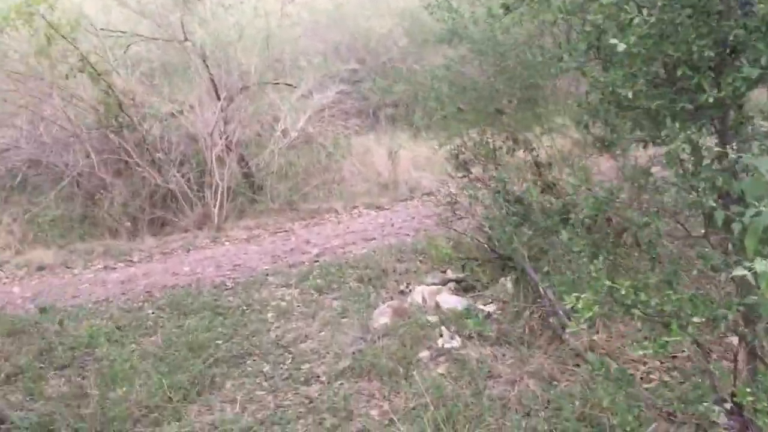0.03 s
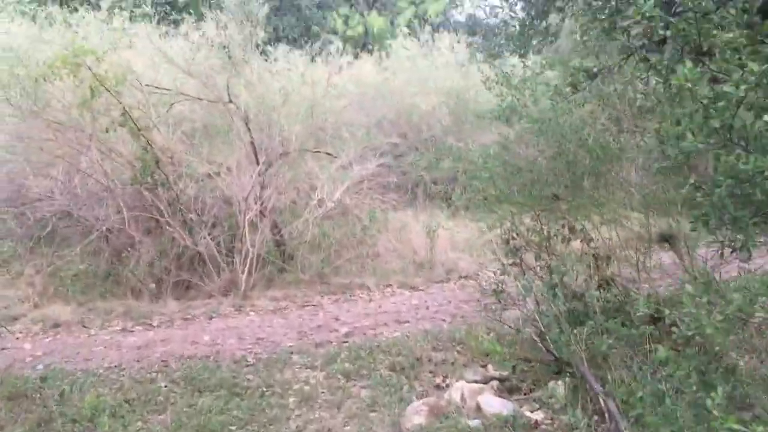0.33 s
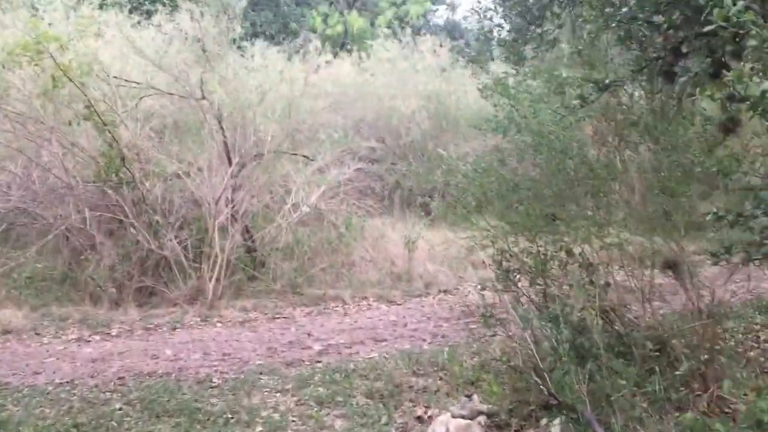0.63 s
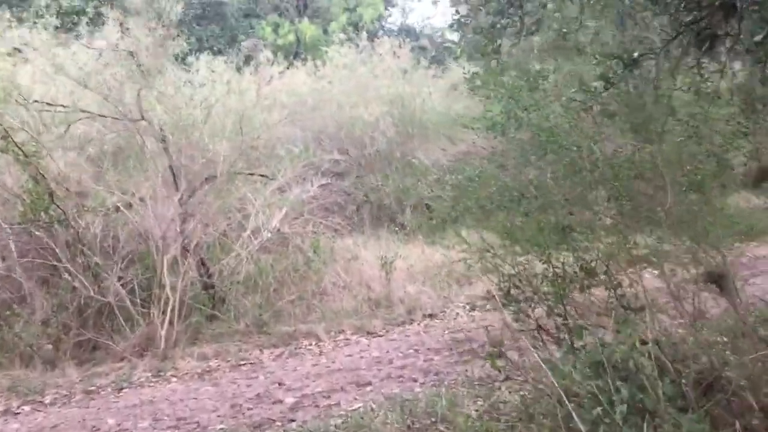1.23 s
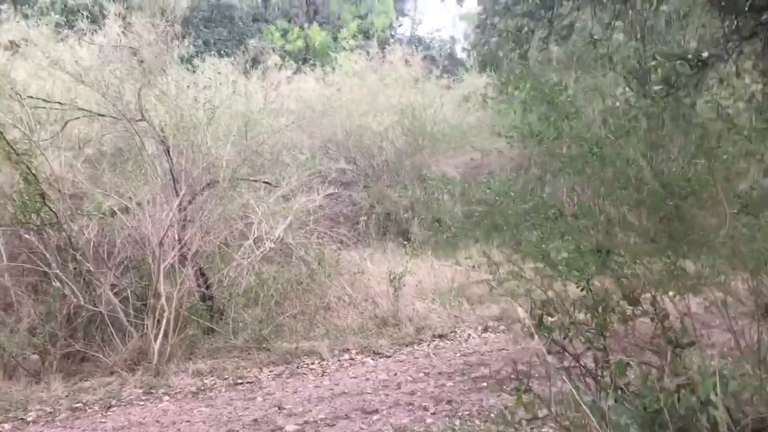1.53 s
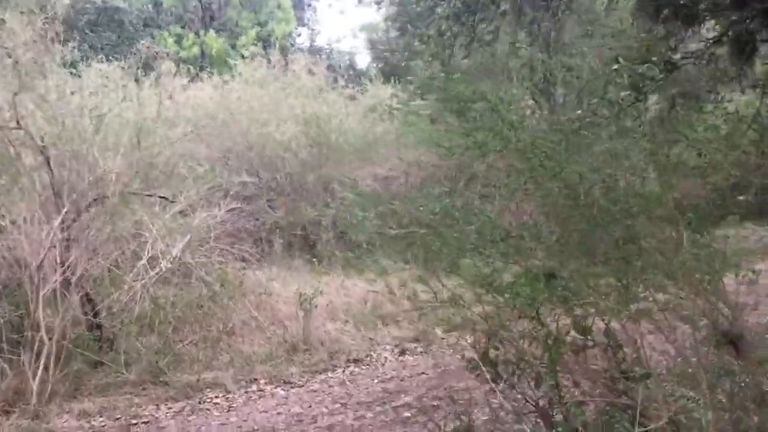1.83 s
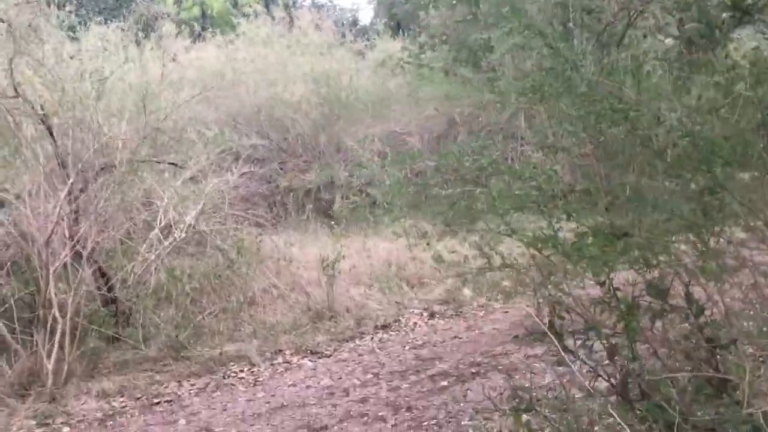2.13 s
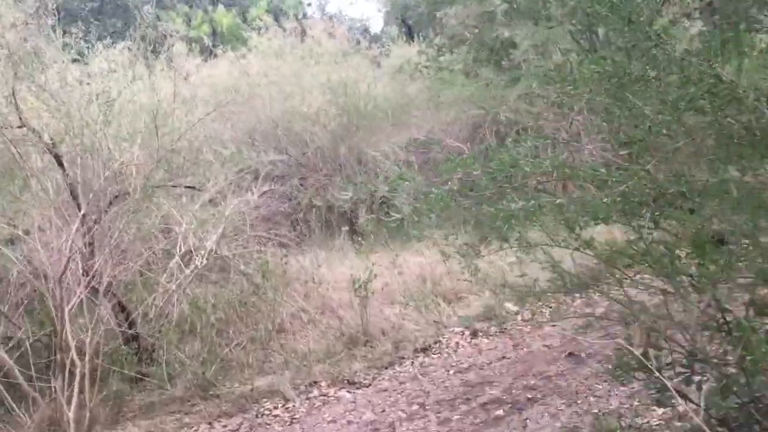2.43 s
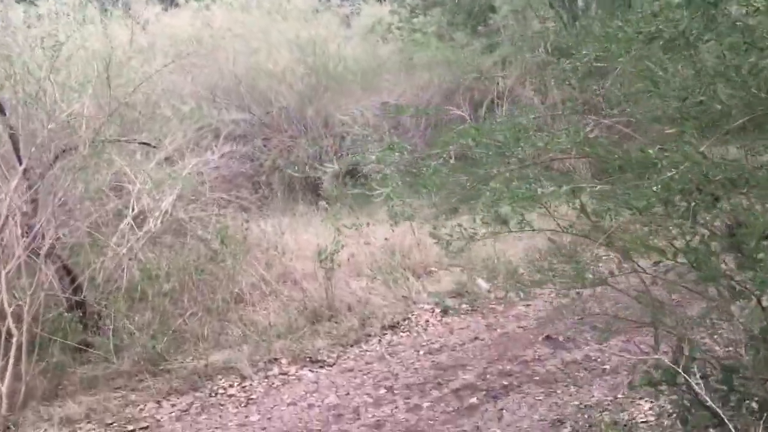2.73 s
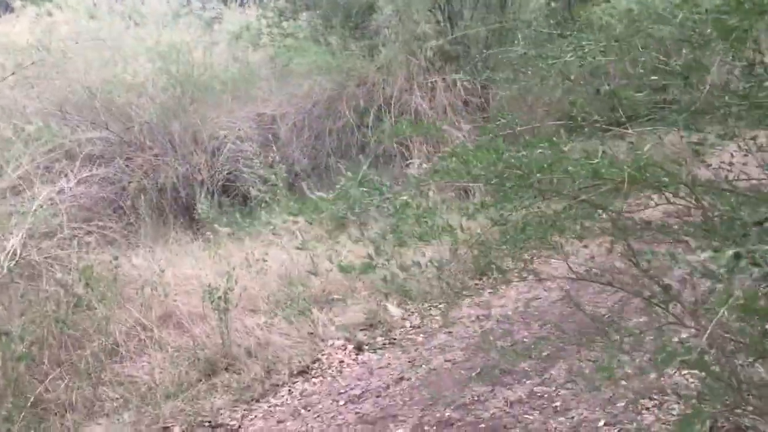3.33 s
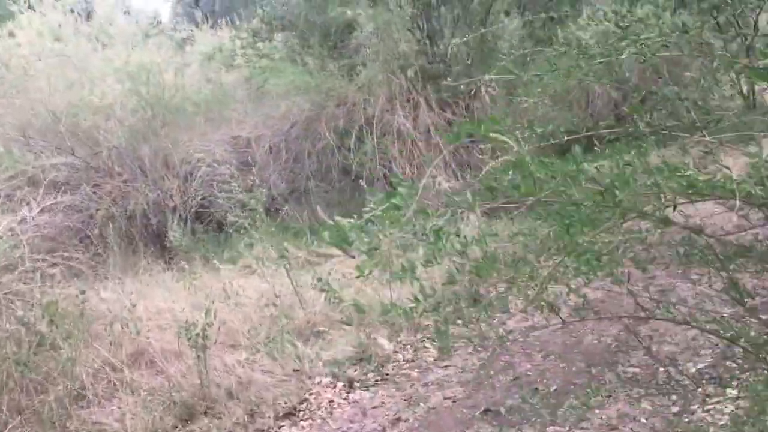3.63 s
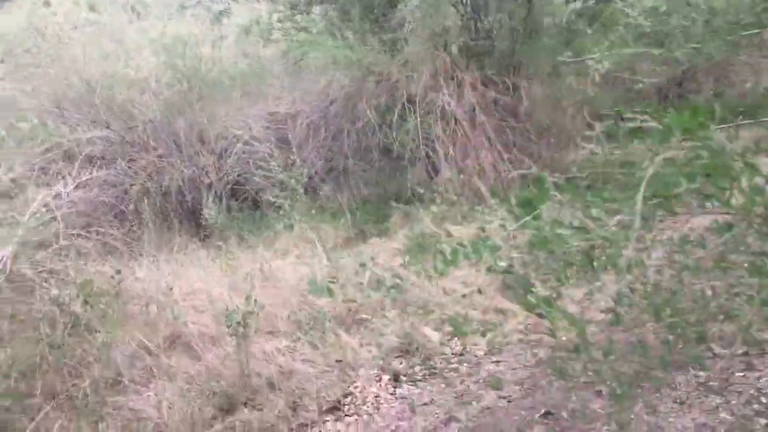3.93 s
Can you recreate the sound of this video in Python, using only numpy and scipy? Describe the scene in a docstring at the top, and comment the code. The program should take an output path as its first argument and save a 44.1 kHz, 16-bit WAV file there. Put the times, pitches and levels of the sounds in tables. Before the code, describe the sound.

Scuffing steps on loose dirt and grit, over the low roar of a faraway road.

```python
"""Slow steps on a dirt trail

Close to a microphone in the walker's hand, soles scuff through loose dirt and dry grass brushes the legs.
Stones crunch, grit and twigs tick, footfalls thud softly and one sole scrapes on stone.
Far behind, traffic roars with a low rumble and a faint hum. The hand softly bumps the microphone."""
import sys
import numpy as np
from scipy import signal
from scipy.fft import rfft, irfft
from scipy.io import wavfile
from scipy.ndimage import uniform_filter1d

SR = 44100
rng = np.random.default_rng(int(sys.argv[2]) if len(sys.argv) > 2 else 0)


def wav_record(signal):
    """Record a signal, one row per channel, as 16-bit PCM in the file named by sys.argv[1]."""
    frames = np.transpose(np.atleast_2d(signal))
    bounded = np.clip(frames, -1, 1)
    # unit amplitude maps onto the largest positive 16-bit level
    quanta = np.round(bounded * 32767).astype(np.int16)
    wavfile.write(sys.argv[1], SR, quanta)


N = 176400
t = np.arange(N) / SR


def undb(db):
    """Decibels to gain."""
    return 10 ** (np.asarray(db) / 20)


def unit(x):
    """Scale to rms 1."""
    return x / np.sqrt(np.mean(x ** 2) + 1e-20)


def bin_octaves(size):
    """Octaves above 1 Hz of each spectrum bin."""
    return np.log2(np.maximum(np.arange(size // 2 + 1) * SR / size, 1))


def colour(x, points, tilt_db=0):
    """Filter by (freq_hz, gain_db) points, tilted per octave; rms 1."""
    octave = bin_octaves(len(x))
    hz, db = np.array(points, float).T
    octaves_below = np.maximum(np.log2(hz[0]) - octave, 0)
    gain_db = np.interp(octave, np.log2(hz), db) + tilt_db * octave - 20 * octaves_below
    return unit(irfft(rfft(x) * undb(gain_db), len(x)))


def ring(x, hz, width):
    """One resonance; width is a share of the centre."""
    w = 2 * np.pi * hz / SR
    a = np.sin(w) * width / 2
    return signal.lfilter([a, 0, -a], [1 + a, -2 * np.cos(w), 1 - a], x)


def band(x, hz, width):
    """The same resonance twice, for steeper sides; rms 1."""
    return unit(ring(ring(x, hz, width), hz, width))


def wander(per_s):
    """A smooth random drift; rms 1."""
    hold = max(int(SR / per_s), 2)
    stairs = np.repeat(rng.standard_normal(N // hold + 1), hold)
    return unit(uniform_filter1d(stairs, hold)[:N])


def grains(per_s, spread_db):
    """Random clicks of uneven size; rms 1."""
    clicks = (rng.random(N) < per_s / SR) * rng.choice([-1, 1], N)
    return unit(clicks * undb(spread_db * np.minimum(rng.exponential(size=N), 5)))


def swells(rows):
    """A gain curve with one bell-shaped swell a row."""
    return sum(undb(db) * np.exp(-((t - peak) / width) ** 2) for peak, width, db in rows)


def add(out, start_s, x):
    """Mix a short sound in at its time."""
    i = max(int(start_s * SR), 0)
    out[i:i + len(x)] += x[:max(N - i, 0)]


# Hiss all around the trail: freq_hz, gain_db
AIR_SPECTRUM = [(1500, -3), (3500, 2), (4900, -4), (6000, -.5), (9500, 1.5), (10400, -10.5), (11200, -5),
                (15500, -5)]

def air():
    """The thin, steady hiss of still air."""
    return undb(-69.5) * colour(rng.standard_normal(N), AIR_SPECTRUM)


# Engine rumble from the far road: freq_hz, gain_db
RUMBLE_SPECTRUM = [(20, -40), (32, -22), (45, -7.5), (58, 1), (80, -2), (120, -7.5), (200, -8.5),
                   (290, -9.5), (480, -19), (900, -28), (2000, -50), (8000, -80)]
# Course that the far hum wavers around: time_s, level_db
HUM_LEVELS = [(0, -53), (.25, -68.5), (.5, -59), (.72, -51.5), (.85, -65), (1.45, -58), (2.1, -64.5),
              (2.9, -80), (4, -78)]

def engines():
    """Far engines rumble, with a wavering hum inside a fading drone."""
    rumble = undb(-51) * colour(rng.standard_normal(N), RUMBLE_SPECTRUM)
    pitch_hz = 346.7 * (1 + .0068 * wander(14))
    hum = np.sqrt(2) * np.sin(2 * np.pi * np.cumsum(pitch_hz) / SR)
    hum_db = np.interp(t, *np.array(HUM_LEVELS).T) + 2.2 * wander(8.86)
    drone = undb(-58 - 3 * t) * band(rng.standard_normal(N), hz=392, width=.67)
    return rumble + undb(hum_db) * hum + drone


def flutter(x, depth_db, per_s):
    """Moving air makes each narrow band of a far sound waver on its own."""
    spectrum, centre_octaves = rfft(x), np.arange(8.5, 12.1, .2)
    indices = np.arange(len(centre_octaves))
    place = np.interp(bin_octaves(N), centre_octaves, indices)
    strips = (irfft(spectrum * np.maximum(1 - np.abs(place - k), 0), N) for k in indices)
    return unit(sum(strip * undb(depth_db * wander(per_s)) for strip in strips))


# Tyre roar as it reaches the trail: freq_hz, gain_db
TYRE_SPECTRUM = [(350, -28), (560, -9.5), (690, -1), (850, .5), (1020, -1), (1170, -7), (1420, -6),
                 (1700, -11.5), (2050, -18), (2400, -25), (2900, -34), (4500, -43.5), (10000, -58)]
# Upper band of that far roar: time_s, level_db
UPPER_ROAR_LEVELS = [(0, -63), (1.2, -64), (2.0, -57), (2.7, -53), (3.3, -65), (4, -51.5)]

def tyres():
    """Tyres roar and slowly recede, their treble lost over the distance."""
    roar = flutter(colour(rng.standard_normal(N), TYRE_SPECTRUM), depth_db=2, per_s=18)
    roar_db = -46 - .23 * t + .25 * wander(3.03)
    upper = band(rng.standard_normal(N), hz=1386, width=.31)
    upper_db = np.interp(t, *np.array(UPPER_ROAR_LEVELS).T)
    return undb(roar_db) * roar + undb(upper_db) * upper


# Handling noise right at the microphone: peak_s, width_s, level_db
HANDLING_BUMPS = [(.53, 0.08, -53), (1.05, .03, -55), (2.37, 0.023, -46), (3.08, .08, -54.5),
                  (3.68, 0.16, -53.5)]

def handling_bumps():
    """Soft, low handling bumps on the handheld microphone."""
    return swells(HANDLING_BUMPS) * band(rng.standard_normal(N), hz=59.5, width=.53)


# Grass against the legs, just below the microphone: start_s, end_s, level_db
GRASS_BRUSHES = [(.14, .62, -63), (.65, .85, -76.5), (0.857, 0.977, -65), (1.002, 1.19, -66),
                 (1.42, 1.84, -68.5), (2.15, 2.493, -68), (2.6, 2.822, -75), (2.83, 3.18, -68.5),
                 (3.38, 3.788, -64.5)]
# Its papery colour: freq_hz, gain_db
GRASS_SPECTRUM = [(3000, -6), (6000, -7), (10000, -7), (12500, 0), (15500, -3)]

def grass(edge_s=.031):
    """Dry grass brushes the moving legs, a thin rustle through each stride."""
    gain = sum(undb(db) * np.clip(np.minimum(t - start, end - t) / edge_s + .5, 0, 1)
               for start, end, db in GRASS_BRUSHES)
    return gain * undb(1.4 * wander(40)) * colour(grains(3000, spread_db=3), GRASS_SPECTRUM)


def pebbles(x, decay_s=.0047):
    """Small stones ring for a few milliseconds at many unrelated pitches."""
    age = t[:SR // 40]
    tail = rng.standard_normal(len(age)) * np.exp(-age / decay_s)
    ringing = signal.fftconvolve(x, tail / np.linalg.norm(tail))[:len(x)]
    return unit(x + undb(-2) * ringing)


# Coarse stones shifting underfoot: peak_s, width_s, level_db
STONE_CRUNCHES = [(.29, 0.014, -56), (.775, 0.022, -61), (1.425, .016, -61), (1.568, .022, -50),
                  (2.258, 0.016, -51.5), (2.44, .025, -61), (2.71, .02, -67), (3.655, 0.011, -60)]
# Their colour at close range: freq_hz, gain_db
CRUNCH_SPECTRUM = [(900, -6), (1900, 2), (2700, -0.5), (4000, -3.5), (5200, -12), (9000, -29)]

def crunches():
    """Larger stones grind briefly, and stray grit keeps settling between the steps."""
    grinding = colour(pebbles(grains(2500, spread_db=2)), CRUNCH_SPECTRUM)
    settling = colour(pebbles(grains(70, spread_db=2)), CRUNCH_SPECTRUM)
    return swells(STONE_CRUNCHES) * grinding + undb(-73) * settling


# Grit and twigs underfoot, before boost_db: start_s, level_db, centre_hz
GRIT_TICKS = [(.298, -45, 5500), (.492, -54, 6000), (.541, -42, 5800), (.617, -50, 6270), (.629, -41, 5970),
              (.630, -45, 12500), (.732, -59, 7030), (1.02, -50, 9000), (1.027, -46, 7500),
              (1.042, -46, 10000), (1.061, -57, 7000), (1.459, -45, 6650), (1.538, -44, 7000),
              (1.547, -44, 6500), (1.729, -44, 5650), (1.813, -45, 6200), (1.817, -46.5, 7500),
              (1.949, -56, 14000), (1.963, -56, 11000), (2.039, -60, 3400), (2.112, -55, 4000),
              (2.129, -57, 4800), (2.167, -52, 6500), (2.315, -57, 5500), (2.331, -48.5, 4070),
              (2.342, -57, 4000), (2.377, -54, 10000), (2.389, -55, 11000), (2.397, -57, 10500),
              (2.448, -52, 3580), (2.603, -59, 7000), (3.124, -53, 12000), (3.146, -48, 14000),
              (3.156, -47, 13400), (3.346, -62, 3600), (3.379, -52.5, 3700), (3.387, -57, 7000),
              (3.442, -66, 13000), (3.641, -52, 11500), (3.66, -49, 6540), (3.73, -47, 10500),
              (3.965, -48, 3270)]

def ticks(boost_db=6, decay_s=.0007, scatter_s=.008):
    """Grit and twigs snap under the sole: a very short crack, then a faint scatter."""
    out, age = np.zeros(N), t[:SR // 20]
    envelope = np.exp(-age / decay_s) + undb(-24) * np.exp(-age / scatter_s)
    rms = np.sqrt(np.mean(envelope ** 2))
    for start, db, hz in GRIT_TICKS:
        burst = rng.standard_normal(len(age)) * envelope
        crack = unit(ring(ring(burst, hz, width=.7), hz, width=1.4))
        add(out, start, undb(db + boost_db) * rms * crack)
    return out


# Footfalls on the trail below the microphone: start_s, level_db, centre_hz
FOOTFALLS = [(1.547, -36.5, 450), (1.556, -38.5, 270), (1.562, -39, 680), (1.916, -48, 290)]

def thuds(decay_s=.022):
    """Heel and sole strike packed earth, which damps them at once."""
    out, age = np.zeros(N), t[:SR // 8]
    envelope = np.exp(-age / decay_s)
    rms = np.sqrt(np.mean(envelope ** 2))
    impact = 5 * np.exp(-age / .0001)
    for start, db, hz in FOOTFALLS:
        push = impact + rng.standard_normal(len(age)) * envelope
        add(out, start, undb(db) * rms * band(push, hz, width=.72))
    return out


# A sole skidding on stone, close by: freq_hz, gain_db
SCRAPE_SPECTRUM = [(600, -6), (1500, -3), (2200, 0.5), (2600, -5), (3100, -11), (3900, -4), (5200, -12),
                   (7000, -17), (9200, -22), (10500, -29), (13000, -25), (15500, -33)]
# Resonances of those stones: pitch_hz, width_ratio, gain_db
STONE_RESONANCES = [(2200, 0.069, 4), (2600, .09, -0.5), (3740, .06, -10), (4370, .05, -14),
                    (7400, .03, -21), (9000, .06, -21)]

def scrape(start_s=3.882, length_s=.025, attack_s=.0051, release_s=.0052):
    """A sole skids: a brief run of stick-slip clicks sets the stones ringing."""
    age = t - start_s
    envelope = np.clip(age / attack_s, 0, 1) * np.exp(-np.maximum(age - length_s, 0) / release_s)
    slips = unit(grains(3000, spread_db=.8) + .8 * rng.standard_normal(N))
    ringing = unit(sum(undb(db) * unit(ring(slips, hz, width)) for hz, width, db in STONE_RESONANCES))
    return undb(-40.5) * envelope * unit(colour(slips, SCRAPE_SPECTRUM) + undb(-6) * ringing)


# Soles sliding close by, before boost_db: peak_s, rise_s, fall_s, level_db, tilt_db_per_octave
SOLE_SCUFFS = [(.16, 0.02, .04, -57, 3), (.265, .035, 0.054, -51.5, 3), (.297, 0.0097, 0.01, -48, -1.5),
               (.505, 0.05, 0.073, -50.5, 2.5), (.882, 0.023, .03, -55.5, 10), (.945, 0.031, 0.025, -58, 2),
               (1.034, 0.019, 0.023, -49, 2), (1.145, .025, 0.033, -59.5, -1),
               (1.425, 0.0087, .02, -59.5, -1), (1.462, 0.017, 0.023, -52.5, 3.5),
               (1.553, .022, 0.016, -47, 0), (1.587, 0.022, 0.026, -49.5, 1.5),
               (1.715, .015, 0.017, -56.5, -3), (1.801, 0.038, 0.04, -55, 0), (2.185, 0.023, 0.023, -52, 2),
               (2.26, 0.025, .022, -54.5, 3.5), (2.32, .02, 0.017, -63.5, -6),
               (2.425, 0.047, .03, -57.5, 0), (2.74, 0.042, .025, -63, 3), (2.865, 0.026, 0.026, -53, 1),
               (2.997, 0.022, .018, -56, 2.5), (3.06, 0.039, 0.04, -61.5, 0.5),
               (3.102, 0.023, .025, -53, 3), (3.445, 0.037, 0.052, -58, 6.5), (3.655, .025, .022, -52, -2),
               (3.725, 0.04, 0.033, -53, 0)]
# Loose dirt under a sole, heard from hand height: freq_hz, gain_db
DIRT_SPECTRUM = [(400, -22), (1500, 0), (2500, 1.5), (3600, -0.5), (4250, 2), (4900, -1.5), (6100, 1.5),
                 (7400, -4), (8400, -0.5), (10400, -3), (12500, 1), (15500, 0)]

def scuffs(boost_db=2, hiss_share=.31, catch_db=.5):
    """Each slide swells and dies: a shower of grains over fine hiss, catching as it goes."""
    out, size = np.zeros(N), SR // 2
    hiss = np.sqrt(hiss_share) * rng.standard_normal(N)
    shower = np.sqrt(1 - hiss_share) * grains(2200, spread_db=5.5)
    rub = (hiss + shower) * undb(catch_db * wander(140))
    for peak, rise, fall, db, tilt_db in SOLE_SCUFFS:
        first = int(np.clip(peak * SR - size / 2, 0, N - size))
        span = slice(first, first + size)
        age = t[span] - peak
        envelope = np.exp(-np.abs(age / np.where(age < 0, rise, fall)) ** 1.14)
        dirt = colour(pebbles(rub[span]), DIRT_SPECTRUM, tilt_db)
        out[span] += undb(db + boost_db) * envelope * dirt
    return out


def scene():
    """One handheld microphone: the traffic far off, the walker close by."""
    background = air() + engines() + tyres() + handling_bumps()
    walker = grass() + crunches() + ticks() + thuds() + scrape() + scuffs()
    return (background + walker)[None]


def record(dry):
    """The recorder cuts the highest treble steeply."""
    top_hz = 15750
    return signal.sosfilt(signal.ellip(10, .2, 70, top_hz, fs=SR, output="sos"), dry)


dry = scene()
out = record(dry)
wav_record(out)
```